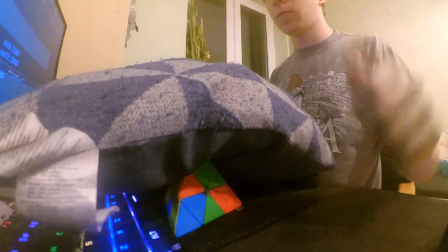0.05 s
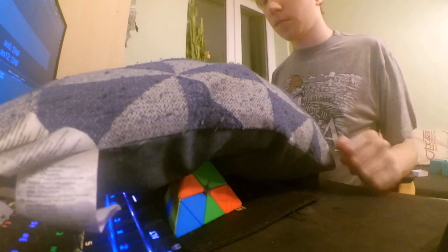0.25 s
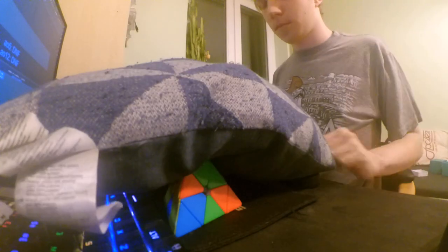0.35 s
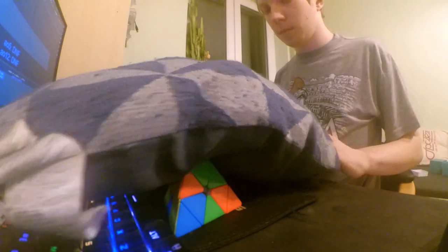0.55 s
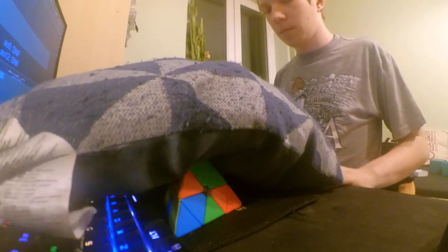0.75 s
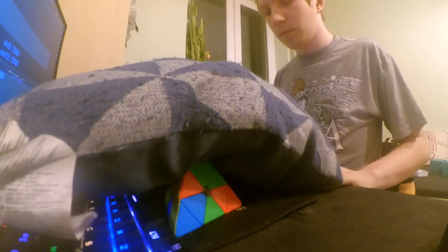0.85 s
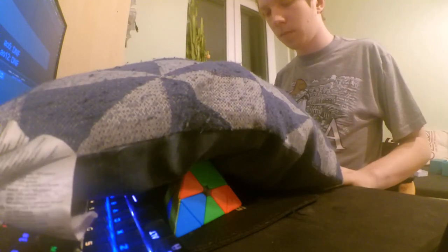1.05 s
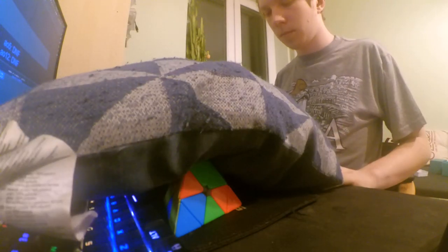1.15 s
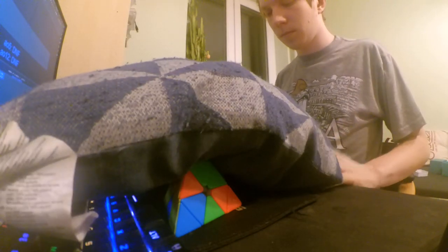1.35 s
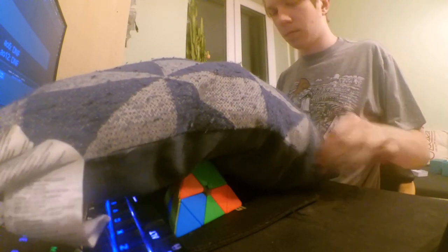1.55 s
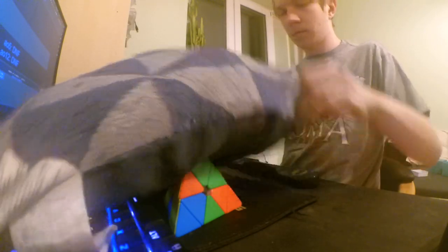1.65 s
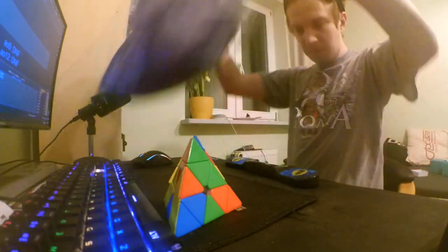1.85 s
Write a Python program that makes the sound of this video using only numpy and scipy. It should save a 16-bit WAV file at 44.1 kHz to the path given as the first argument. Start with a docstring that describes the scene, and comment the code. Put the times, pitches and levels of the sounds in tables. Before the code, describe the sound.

A fist thumps a desk and loose things rattle briefly. Cloth rustles as a hand slides under a pillow, two softer bumps follow, and the pillow is whisked away. The microphone stands on the desk in a small, quiet room.

```python
"""A desk, thumped by a fist beside a pillow, rings in its damped modes and sways on its legs.
Loose things rattle in brief impacts, and the cloth rustles by friction. The hand slides under the
pillow, bumps the desk twice more and whisks the pillow away, displacing a puff of air.
The microphone stands on the desk, in a small quiet room with a humming computer."""
import sys
import numpy as np
from scipy import signal
from scipy.fft import rfft, irfft, next_fast_len
from scipy.io import wavfile

SR = 44100
rng = np.random.default_rng(int(sys.argv[2]) if len(sys.argv) > 2 else 0)


def file_out(sig):
    """Save sig as 16-bit WAV at sys.argv[1]."""
    # one column per channel
    cols = np.atleast_2d(sig).T
    # limit, then scale
    lim = np.clip(cols, -1, 1)
    pcm = np.round(lim * 32767).astype(np.int16)
    wavfile.write(sys.argv[1], SR, pcm)


N = 83790

# room noise spectrum (frequency [Hz], relative level [dB])
FLOOR_SPECTRUM = [(12, -5), (27, -2.5), (42, -9.5), (62, -23.5), (95, -28), (125, -25), (150, -23.5),
                  (200, -26.5), (290, -27.5), (440, -34), (630, -39.5), (1200, -43), (1580, -40.5),
                  (2300, -50), (4800, -52.5), (7000, -57), (15500, -59)]
# tones of mains and fans (frequency [Hz], level [dB])
HUM_TONES = [(119, -61.5), (544, -82.5), (1561, -82)]

# desk modes (frequency [Hz], relative level [dB], t60 [s])
DESK_MODES = [(33, 2, .3), (47, -4, .11), (69, -6, .17), (112, -1, .21), (165, -23, .2), (200, -16, .24),
              (255, -24, .2), (295, -16, .3), (366, -25, .4), (392, -25, .25), (466, -19, .22),
              (592, -25, .18), (745, -25, .18), (810, -23, .18), (955, -18, .15)]
SWAY_MODE = (26.55, -9.5, 1.58)  # the whole desk rocks on its legs
# blows on the desk (time [s], level [dB], force rise time [s], deep mode gain [dB],
# middle mode gain [dB], thud level [dB])
DESK_BLOWS = [(0.2022, -24, 0.0012, -11.5, 1, -37.5), (0.2095, -23.5, 0.0013, -20, 8.5, -34),
              (0.2169, -12, 0.0018, 2.5, 3.5, -39), (0.556, -34.5, 0.0018, -1, -12, -65),
              (0.76, -26, .005, -5.5, -4, -65), (0.7726, -15.5, 0.0036, -17.5, 13, -72),
              (0.804, -20.5, 0.0022, -6.5, 5.5, -60), (1.407, -39, 0.0016, -7, -1, -70.5),
              (1.464, -31.5, 0.003, -10.5, -12, -55), (1.472, -18.5, 0.0023, -15, 9, -68),
              (1.4908, -28.5, 0.0017, -11, 12, -72), (1.63, -58, 0.0039, 12, -12, -55.5)]
# dense upper modes of the desk top (frequency [Hz], relative level [dB])
THUD_SPECTRUM = [(40, -23), (120, 5.5), (200, 0.5), (330, 2.5), (480, 1.5), (700, -6), (950, -8),
                 (1400, -16.5), (2100, -37), (2900, -23.5), (4200, -34), (7000, -51)]

# light contacts of hand and loose things (time [s], crack t60 [s], ring frequency [Hz],
# ring level [dB], slap level [dB], clack level [dB], snap level [dB])
CONTACTS = [(0.2033, 0.011, 920, -46, -55, -41, -60), (0.2105, 0.012, 950, -65, -47, -37.5, -47),
            (0.2442, 0.016, 1376, -41.5, -64, -40, -53.5), (.264, 0.0082, 643, -41.5, -62, -41.5, -66),
            (0.585, 0.092, 1020, -55.5, -76, -81, -68), (0.6601, 0.0091, 1620, -52, -55, -47, -43),
            (0.7922, 0.024, 960, -53.5, -45, -53.5, -72), (1.427, 0.021, 874, -55.5, -53, -70, -60),
            (1.4724, 0.02, 920, -47, -47.5, -54.5, -61.5), (1.6026, 0.015, 1380, -64, -59, -52, -55),
            (1.8505, 0.028, 1610, -48, -50.5, -47.5, -69.5)]
# a crack's slap, clack and bright snap (frequency [Hz], relative level [dB])
SLAP_SPECTRUM = [(500, -31), (1500, -44), (1900, -1.5), (2250, -0.5), (3100, -17), (4900, -13.5),
                 (7000, -23.5), (14000, -31)]
CLACK_SPECTRUM = [(300, -34), (600, 13.5), (1000, 6), (2000, -4.5), (2800, 2), (4300, -4), (5500, -19.5),
                  (14000, -48)]
SNAP_SPECTRUM = [(1000, -47), (5400, -15), (6400, -1.5), (8000, -3.5), (9500, -9.5), (12000, -16),
                 (15000, -13)]

# strokes on the cloth (peak time [s], rise [s], fall [s], level [dB], body gain [dB], hiss gain [dB])
CLOTH_STROKES = [(0.233, 0.028, 0.074, -56.5, -15, -6), (0.287, 0.046, 0.074, -55.5, 6.5, -3),
                 (0.317, 0.019, 0.043, -63.5, 9.5, -2), (.41, 0.098, 0.088, -77, 15, -5),
                 (0.517, 0.04, 0.061, -66, 5, -37), (0.646, 0.11, 0.18, -66.5, 3, -3.5),
                 (0.811, 0.054, 0.083, -61.5, -15, -8.5), (1.427, 0.029, 0.21, -64, 1, -7),
                 (1.489, 0.018, 0.078, -65.5, -8, -9), (1.635, 0.052, 0.42, -74, 13, -3.5),
                 (1.803, .04, 0.045, -57, 7, -15), (1.833, 0.038, 0.08, -57, -1.5, -11)]
# the stuffing, the rubbing weave and its hiss (frequency [Hz], relative level [dB])
BODY_SPECTRUM = [(60, -4.5), (140, -4), (210, -0.5), (370, -0.5), (700, -10.5), (1200, -17.5),
                 (2500, -41.5)]
RUB_SPECTRUM = [(300, 2.5), (900, -2), (1650, 6.5), (2100, 4), (2700, 2.5), (3450, 2), (3950, -7),
                (4800, -9), (7000, -39), (14000, -22)]
HISS_SPECTRUM = [(1500, -36), (4000, 7), (7000, 3), (10000, -1.5), (14500, -9)]

# air pushed by the pillow (peak time [s], rise [s], fall [s], level [dB])
AIR_PUFFS = [(1.65, 0.02, 0.24, -37.5), (1.819, 0.055, 0.082, -29.5)]
# pressure spectrum of a puff (frequency [Hz], relative level [dB])
PUFF_SPECTRUM = [(8, -5.5), (16, 6), (28, 2.5), (50, -17.5), (75, -16.5), (120, -11.5), (200, -34),
                 (600, -72)]

# reverberation time of the room (frequency [Hz], t60 [s])
ROOM_T60 = [(80, 0.92), (115, .3), (170, 0.57), (360, 0.93), (500, 0.2), (900, 0.19), (3000, 0.25),
            (8000, 0.31), (15000, 0.14)]


def amp(db):
    """Amplitude ratio of a level in decibels."""
    return 10 ** (np.asarray(db) / 20)


def unit(x):
    """Normalisation to rms 1."""
    return x / np.sqrt(np.mean(x ** 2) + 1e-20)


def along(points, hz):
    """Interpolation of (frequency [Hz], value) points on a logarithmic frequency axis."""
    frequencies, values = np.transpose(points)
    return np.interp(np.log(hz + 1), np.log(frequencies + 1), values)


def since(onset):
    """Time elapsed since an onset, in seconds, at every sample."""
    return np.arange(N) / SR - onset


def decay(onset, t60):
    """Exponential damping from an onset: 60 dB in t60 seconds."""
    t = since(onset)
    return (t >= 0) * np.exp(-np.log(1000) * np.maximum(t, 0) / t60)


def swell(peak, rise, fall):
    """Gaussian growth, exponential decay: 20 dB down one rise before and one fall after the peak."""
    t = since(peak)
    return 10 ** -np.where(t < 0, (t / rise) ** 2, t / fall)


def coloured(x, spectrum):
    """Minimum-phase filtering to a given spectrum, with unit power gain."""
    size = 2 * next_fast_len(N)
    gain = unit(amp(along(spectrum, np.fft.rfftfreq(size, 1 / SR))))
    cepstrum = irfft(np.log(gain + 1e-7))
    cepstrum[1:size // 2] *= 2  # folding makes the filter causal
    cepstrum[size // 2 + 1:] = 0
    return irfft(rfft(x, size) * np.exp(rfft(cepstrum)))[:N]


def noise(spectrum):
    """Spectrally shaped Gaussian noise of rms 1."""
    return unit(coloured(rng.standard_normal(N), spectrum))


def background(floor_db=-50.5, drift=0.0055):
    """Mains and fan tones, each with a random walk in phase, add to broadband room noise."""
    hum = np.zeros(N)
    for hz, db in HUM_TONES:
        wander = drift * np.sqrt(hz / 1000) * np.cumsum(rng.standard_normal(N))
        hum += amp(db) * np.sqrt(2) * np.sin(2 * np.pi * hz * since(0) + wander)
    return hum + amp(floor_db) * noise(FLOOR_SPECTRUM)


def desk(deep_hz=40, middle_hz=(150, 275)):
    """Modal response convolved with each force pulse: a slower push excites only the low modes."""
    out = np.zeros(N)
    t = since(0)[:SR // 20]
    for onset, db, rise, deep_db, middle_db, _ in DESK_BLOWS:
        ring = np.zeros(N)
        for hz, mode_db, t60 in DESK_MODES + [SWAY_MODE]:
            # the place of a blow sets how strongly the deep and middle modes answer
            place_db = deep_db * (hz < deep_hz) + middle_db * (middle_hz[0] < hz < middle_hz[1])
            ring += amp(mode_db + place_db) * decay(onset, t60) * np.sin(2 * np.pi * hz * since(onset))
        force = (t * np.exp(-t / rise)) ** 2
        out += amp(db) * signal.fftconvolve(ring, force / force.sum())[:N]
    return out


def thuds(t60=0.14):
    """Modal overlap: the crowded upper modes of the desk top merge into a dull noise at each blow."""
    return sum(amp(db) * decay(onset, t60) * noise(THUD_SPECTRUM) for onset, *_, db in DESK_BLOWS)


def taps(pair_spread=0.107, pair_db=-12, ting_hz=6960, ting_gain_db=-30):
    """Impact excitation: each contact cracks, and a close pair of modes beats in a hollow ring."""
    rings, cracks = np.zeros(N), np.zeros((3, N))
    for onset, crack_t60, hz, ring_db, slap_db, clack_db, snap_db in CONTACTS:
        phase = 2 * np.pi * hz * since(onset)
        pair = np.sin(phase) + amp(pair_db) * np.sin(phase * (1 - pair_spread))
        rings += amp(ring_db) * decay(onset, t60=0.036) * pair
        ting = np.sin(2 * np.pi * ting_hz * since(onset))  # faint metallic ring after the snap
        rings += amp(snap_db + ting_gain_db) * decay(onset, t60=0.23) * ting
        cracks += amp([[slap_db], [clack_db], [snap_db]]) * decay(onset, crack_t60)
    bands = zip(cracks, (SLAP_SPECTRUM, CLACK_SPECTRUM, SNAP_SPECTRUM))
    return rings + sum(coloured(crack * rng.standard_normal(N), spectrum) for crack, spectrum in bands)


def fibres(slips_per_s=2500, slip_share=0.47):
    """Stick-slip friction: random impulses of slipping threads ride on a smooth rubbing noise."""
    slips = unit((rng.random(N) < slips_per_s / SR) * rng.standard_normal(N))
    return np.sqrt(slip_share) * slips + np.sqrt(1 - slip_share) * rng.standard_normal(N)


def cloth():
    """Frictional excitation: each stroke sounds the stuffing, the rubbing weave and its hiss."""
    body, rub, hiss = np.zeros((3, N))
    for peak, rise, fall, db, body_db, hiss_db in CLOTH_STROKES:
        effort = amp(db) * swell(peak, rise, fall)
        body += effort * amp(body_db)
        rub += effort
        hiss += effort * amp(hiss_db)
    bands = (body, BODY_SPECTRUM), (rub, RUB_SPECTRUM), (hiss, HISS_SPECTRUM)
    return sum(coloured(envelope * fibres(), spectrum) for envelope, spectrum in bands)


def puffs():
    """Air displacement: the moving pillow causes slow pressure fluctuations at the microphone."""
    envelope = sum(amp(db) * swell(peak, rise, fall) for peak, rise, fall, db in AIR_PUFFS)
    return envelope * noise(PUFF_SPECTRUM)


def room(x, delay_s=0.0064):
    """Diffuse reverberation: reflections decay at a rate that depends on frequency, the bass lingering."""
    hz, t, spectra = signal.stft(rng.standard_normal(SR // 2), SR, nperseg=256)
    damping = np.exp(-np.log(1000) * t / along(ROOM_T60, hz)[:, None])
    _, tail = signal.istft(spectra * damping, SR, nperseg=256)
    tail *= np.arange(len(tail)) > delay_s * SR
    return signal.fftconvolve(x, tail / np.linalg.norm(tail))[:N]


def scene():
    """Superposition: direct sounds and their reverberation add to the puffs and the background."""
    wood = desk()
    thud_and_rustle = thuds() + cloth()
    rattle = taps()
    reverberation = room(amp(-22) * wood + amp(-10.5) * thud_and_rustle + amp(-13) * rattle)
    return (wood + thud_and_rustle + rattle + reverberation + puffs() + background())[None]


def record(dry, low_cut_hz=15.2, top_hz=15500):
    """Band limiting: the microphone is a first-order high-pass, and the recorder cuts the top treble."""
    size = 2 * next_fast_len(N)
    hz = np.fft.rfftfreq(size, 1 / SR)
    high_pass = 1j * hz / (1j * hz + low_cut_hz)
    return irfft(rfft(dry, size) * high_pass * (hz < top_hz), size)[..., :N]


dry = scene()
out = record(dry)
file_out(out)
```